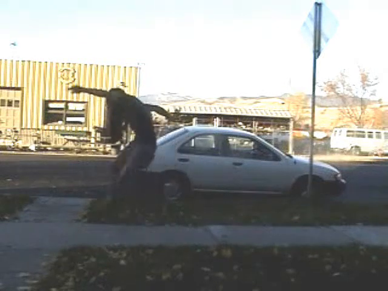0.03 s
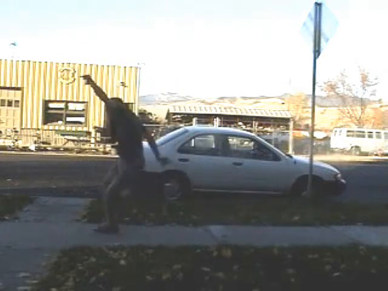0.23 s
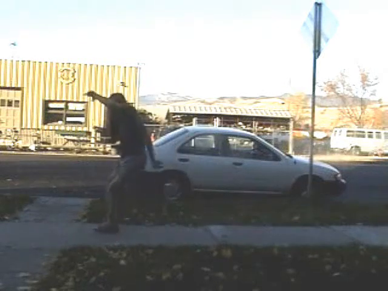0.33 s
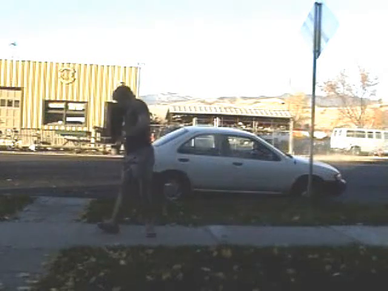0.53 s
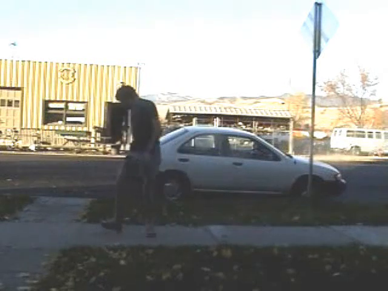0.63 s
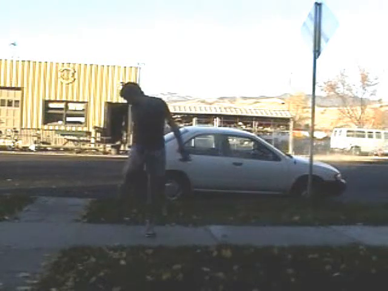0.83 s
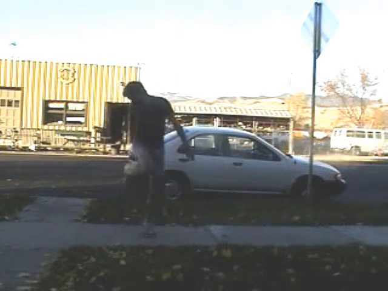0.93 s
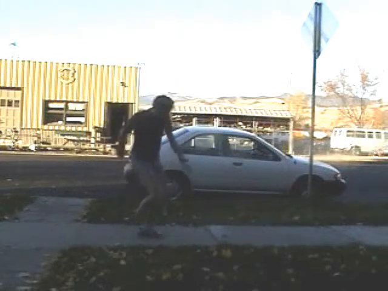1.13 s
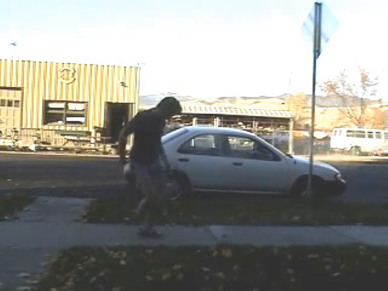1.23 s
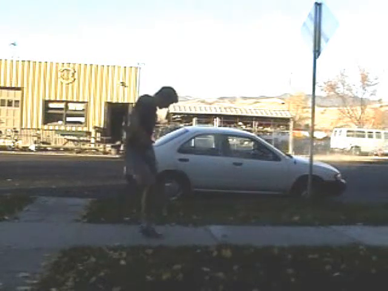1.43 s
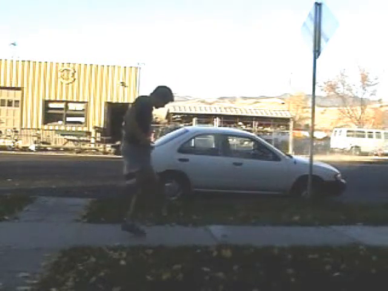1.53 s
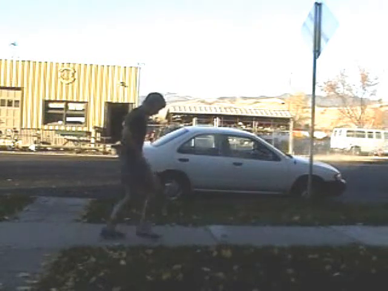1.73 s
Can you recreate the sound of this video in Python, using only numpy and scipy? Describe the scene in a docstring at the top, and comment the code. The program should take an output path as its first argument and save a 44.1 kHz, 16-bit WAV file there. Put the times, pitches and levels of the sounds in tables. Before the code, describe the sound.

Shoes land with a slap on concrete, then step and scuff over distant traffic.

```python
"""Footbag footwork on a sidewalk

A player lands on concrete, steps and shuffles a few metres away. Soles slap and ring, body weight
thumps, then the shoes scuff over grit and crack single grains. The street returns a short, thin echo.
Distant traffic, engines and light wind make a steady floor."""
import sys
import numpy as np
from scipy import signal
from scipy.fft import rfft, irfft
from scipy.io import wavfile
from scipy.ndimage import uniform_filter1d

SR = 44100
rng = np.random.default_rng(int(sys.argv[2]) if len(sys.argv) > 2 else 0)


def master_out(mix):
    """Clip the mix to full scale and print it as 16-bit PCM to the path in sys.argv[1]."""
    frames = np.transpose(np.atleast_2d(mix))
    ceiling = np.clip(frames, -1, 1)
    pcm = np.round(ceiling * 32767).astype(np.int16)
    wavfile.write(sys.argv[1], SR, pcm)


N = 79380  # 1.8 s


def amp(db):
    """dB to gain."""
    return 10 ** (np.asarray(db) / 20)


def unit(x):
    """Scale to rms 1."""
    return x / np.sqrt(np.mean(x ** 2) + 1e-20)


def read(points, hz):
    """Interpolate a table on a log-frequency axis."""
    f, value = np.transpose(points)
    return np.interp(np.log(hz + 1), np.log(f + 1), value)


def add(mix, at_s, sound):
    """Mix a sound in, in place."""
    part = mix[max(round(at_s * SR), 0):][:len(sound)]
    part += sound[:len(part)]


def bins(size):
    """Real-FFT frequencies [Hz]."""
    return np.fft.rfftfreq(size, 1 / SR)


def click(colour=((0, 0), (SR, 0)), bright_hz=SR, size=4096):
    """Minimum-phase click of a given colour (default flat), dulled above bright_hz."""
    hz = abs(np.fft.fftfreq(size, 1 / SR))
    log_gain = np.log(amp(read(colour, hz))) - .5 * np.log1p((hz / bright_hz) ** 4)
    spectrum = np.exp(np.conj(signal.hilbert(log_gain)))
    return np.fft.ifft(spectrum).real[:size // 2]


def low_pass(x, edge_hz):
    """Steep stereo FIR low-pass."""
    taps = signal.firwin(401, edge_hz, window=("kaiser", 8), fs=SR)
    return signal.oaconvolve(x, taps[None], "same", axes=1)


def stereo_pair(a, b, hz):
    """Two independent spectra to a partly coherent left and right."""
    # outdoor sound field: (frequency [Hz], left-right coherence [0..1])
    coherence = [(30, .93), (100, 0.92), (250, 0.83), (1000, 0.42), (2500, 0.25), (7000, 0.4)]
    same = read(coherence, hz)
    mid, side = np.sqrt((1 + same) / 2) * a, np.sqrt((1 - same) / 2) * b
    return np.array([mid + side, mid - side])


def traffic(size=2048):
    """Far roar of traffic and wind with drifting patches; the midrange swells slowly."""
    # roar spectrum: (frequency [Hz], relative density [dB])
    colour = [(15, -55.5), (25, -8.5), (128, -3.5), (152, -5), (167, -8.5), (217, -3.5), (263, -10),
              (343, -6.5), (416, -14.5), (529, -9.5), (641, -16), (876, -14), (1320, -18), (1760, -20),
              (3890, -32), (6440, -34.5), (7800, -41), (10100, -81), (17200, -120)]
    # midrange swell: (time [s], level [dB])
    swell = [(0, 0.5), (.12, 0), (.38, -1), (.55, -0.5), (.68, 1), (.85, 2.5), (1.02, -1), (1.25, 1),
             (1.48, -1), (1.64, 0), (1.8, 1.5)]
    # swell depth by band: (frequency [Hz], share [0..1])
    depth = [(200, 0), (400, 0.81), (1600, 1), (4000, 1), (7000, .3)]
    level_db, patch_rms_db, edge_hz = -44.5, 1.54, 7950
    hop, hz = size // 4, bins(size)
    re_a, im_a, re_b, im_b, patches = rng.standard_normal((5, N // hop + 5, len(hz)))
    patches = uniform_filter1d(patches, size=8, axis=0)
    patches = unit(uniform_filter1d(patches, size=8, axis=1))
    frame_s = np.arange(len(patches)) * hop / SR
    swell_db = np.interp(frame_s, *np.transpose(swell))[:, None] * read(depth, hz)
    noise = stereo_pair(re_a + 1j * im_a, re_b + 1j * im_b, hz)
    frames = noise * amp(read(colour, hz) + patch_rms_db * patches + swell_db)
    roar = signal.istft(frames.transpose(0, 2, 1), nperseg=size, noverlap=size - hop)[1][:, :N]
    return amp(level_db) * unit(low_pass(roar, edge_hz))


def engine_drone():
    """Far engines: narrow, wavering noise bands."""
    # engine bands: (centre [Hz], width [Hz], level [dB])
    bands = [(118.7, 27, -61), (210, 19.3, -56), (300.6, 43, -60)]
    hz = bins(N)
    noise = stereo_pair(*rfft(rng.standard_normal((2, N))), hz)
    out = np.zeros((2, N))
    for centre_hz, width_hz, db in bands:
        band = np.exp(-2 * ((hz - centre_hz) / width_hz) ** 2)
        out += amp(db) * unit(irfft(noise * band, N))
    return out


def street_echo(source, delay_s=.006):
    """Scatter from a parked car, kerb and walls; each band decays at its own rate."""
    # echo decay: (frequency [Hz], T60 [s])
    decay = [(100, 0.28), (400, 0.33), (1200, 0.31), (3000, 0.36), (7500, 0.25)]
    # echo spectrum: (frequency [Hz], gain [dB])
    colour = [(100, -10.5), (400, -15), (1200, -17), (3000, -10.5), (7500, -15)]
    hz, t, noise = signal.stft(rng.standard_normal((2, SR // 2)), SR, nperseg=256)
    hz = hz[:, None]
    frames = stereo_pair(*noise, hz) * amp(-60 * t / read(decay, hz))
    tail = signal.istft(frames, SR)[1]
    tail *= np.arange(tail.shape[1]) / SR > delay_s
    sent = signal.fftconvolve(source, click(colour))
    return signal.fftconvolve(sent[None], tail / np.linalg.norm(tail[0]), axes=1)[:, :N]


def first_reflections(source):
    """Dulled early returns off the pavement and the parked car."""
    # echo paths: (delay [s], gain [ratio])
    paths = [(.003, 0.18), (.0128, 0.1)]
    dulled = signal.fftconvolve(source, click(bright_hz=1530))
    out = np.zeros(N)
    for delay_s, gain in paths:
        add(out, delay_s, gain * dulled)
    return out


def grit(decay_s=0.00029):
    """Single sand grains crack under the shoe."""
    # grain cracks: (time [s], relative level [dB])
    cracks = [(0.626, -21), (0.6439, -8.5), (1.0482, -17.5), (1.0812, -25), (1.0868, -19), (1.093, -24),
              (1.0950, -19.5), (1.1172, -20), (1.1308, -19), (1.557, -25.5), (1.727, -21)]
    # crack spectrum: (frequency [Hz], gain [dB])
    colour = [(200, -21.5), (1500, -17), (3000, -0.5), (4500, 4.5), (6000, 0), (7400, 3), (8100, -16)]
    out, t = np.zeros(N), np.arange(SR // 100) / SR
    for at_s, db in cracks:
        crack = rng.standard_normal(len(t)) * np.exp(-t / decay_s)
        add(out, at_s, amp(db) * crack / np.linalg.norm(crack))
    return signal.fftconvolve(out, click(colour))[:N]


def scuffs(slips_per_s=7000, spread_db=4.5):
    """Dense tiny slips start as a sole touches, swell as it loads, and die away."""
    # scrapes on grit: (start [s], peak [s], swell [dB], decay [s], level [dB], tilt [dB/octave])
    strokes = [(0.024, 0.023, 11, 0.0046, -46.5, 0), (0.161, 0.167, 7, .006, -45.5, 1),
               (0.223, 0.229, 1, .028, -30, -4), (0.401, 0.404, 13, .005, -54.5, 3),
               (0.627, 0.646, 14.5, .007, -26.5, -2), (0.661, 0.649, 4, .025, -36.5, 2),
               (1.016, 1.056, 11.5, .014, -48.5, 0.5), (1.068, 1.094, 7, .007, -49.5, -1),
               (1.12, 1.125, 10, .009, -42, -0.5), (1.569, 1.574, 9, .008, -49.5, -2),
               (1.7115, 1.723, 4, .014, -38.5, 2.5)]
    # scrape spectrum: (frequency [Hz], relative level [dB])
    colour = [(80, -18.5), (300, -15), (500, -6.5), (800, -3), (1300, 3.5), (2300, -3.5), (3300, -6),
              (4300, -3), (5800, -9), (7400, -4.5), (8100, -17)]
    out, t = np.zeros(N), np.arange(N) / SR
    for start_s, peak_s, swell_db, decay_s, db, tilt_db in strokes:
        sizes = amp(spread_db * np.minimum(rng.exponential(1, N), 3))
        slips = sizes * rng.choice([-1., 1.], N) * (rng.random(N) < slips_per_s / SR)
        tilted = [(hz, band_db + tilt_db * np.log2(hz / 2000)) for hz, band_db in colour]
        scrape = unit(signal.fftconvolve(slips, click(tilted))[:N])
        rise = (t > start_s) * amp(np.interp(t, [start_s, peak_s], [-swell_db, 0]))
        fall = np.exp(-np.maximum(t - peak_s, 0) / decay_s)
        out += amp(db) * rise * fall * scrape
    return out


def thumps(pitch_hz=84.9, rise_s=0.007):
    """Low, swelling boom as body weight comes down."""
    # landings: (time [s], level [dB], T60 [s])
    landings = [(0.229, -27.5, 0.41), (0.645, -30, .16)]
    out, t = np.zeros(N), np.arange(SR) / SR
    boom = (1 - np.exp(-t / rise_s)) * np.sin(2 * np.pi * pitch_hz * t)
    for at_s, db, t60_s in landings:
        add(out, at_s, amp(db - 60 * t / t60_s) * boom)
    return out


def slaps(pulse_db=13):
    """Each contact is a pressure pulse plus a brief ring of the sole; soft contacts are duller."""
    # shoe and bag contacts: (time [s], gain [dB], low-pass corner [Hz])
    contacts = [(0.0244, -16.5, 605), (0.2248, 2, 8050), (0.2346, -4, 1400), (0.2374, -10, 907),
                (0.2482, -8.5, 4500), (0.2508, -3, 600), (0.2601, -5, 650), (0.6258, -14, 900),
                (0.655, -25, 500), (1.1240, -30, 700), (1.712, -19, 1210)]
    # pulse spectrum: (frequency [Hz], relative level [dB])
    colour = [(40, -20.5), (120, 4.5), (250, 2), (650, -2), (1200, -3), (2000, -3.5), (3500, -11.5),
              (5700, -19), (7400, -9.5), (8100, -16.5)]
    # sole resonances: (frequency [Hz], relative level [dB], T60 [s])
    modes = [(223, -39, 0.16), (291.8, -31, 0.065), (430, -37.5, .13), (615, -30, 0.047),
             (722, -22.5, 0.038), (908, -27, 0.049), (1020, -30.5, .04), (1187, -23, 0.048)]
    out, t = np.zeros(N), np.arange(SR // 4) / SR
    blow = sum(amp(db - 60 * t / t60_s) * np.sin(2 * np.pi * hz * t) for hz, db, t60_s in modes)
    add(blow, 0, amp(pulse_db) * click(colour))
    for at_s, db, bright_hz in contacts:
        add(out, at_s, amp(db) * signal.fftconvolve(blow, click(bright_hz=bright_hz)))
    return out


def lean_left(stereo):
    """Level and phase differences put the player slightly left of centre."""
    # level difference: (frequency [Hz], left minus right [dB])
    balance = [(200, 0), (1000, -0.5), (2000, -1.5), (4500, 5), (7500, 2.5)]
    # phase difference: (frequency [Hz], left lead [rad])
    lead = [(100, .03), (500, .15), (1000, 0.37), (2000, 0.45), (4000, 0.4), (7500, .3)]
    hz = bins(N)
    left = amp(read(balance, hz) / 2) * np.exp(.5j * read(lead, hz))
    return irfft(rfft(stereo) * np.array([left, 1 / left]), N)


def scene():
    """Feet and their echo over traffic and engines."""
    hits = slaps()
    feet = hits + first_reflections(hits) + thumps() + scuffs() + grit()
    side = .25 * scuffs()  # independent slips add width
    direct = lean_left(np.array([feet + side, feet - side]))
    return direct + street_echo(feet) + traffic() + engine_drone()


def record(dry):
    """The small camera's band limit."""
    return low_pass(dry, edge_hz=8100)


dry = scene()
out = record(dry)
master_out(out)
```